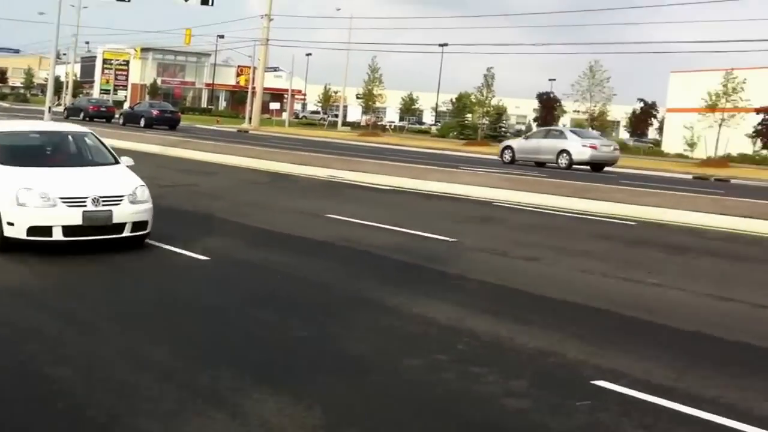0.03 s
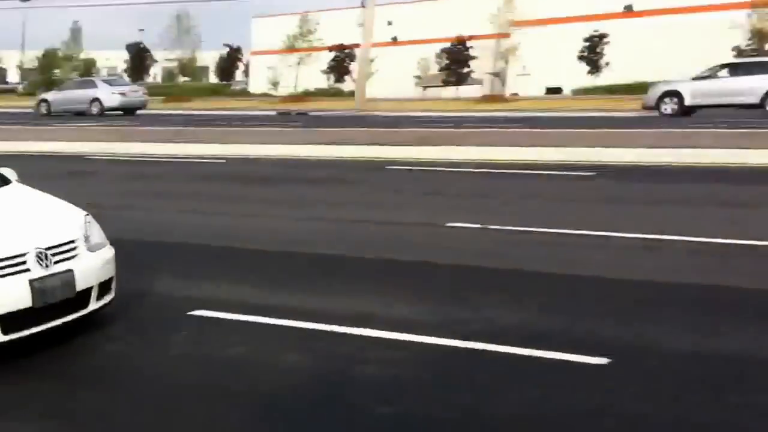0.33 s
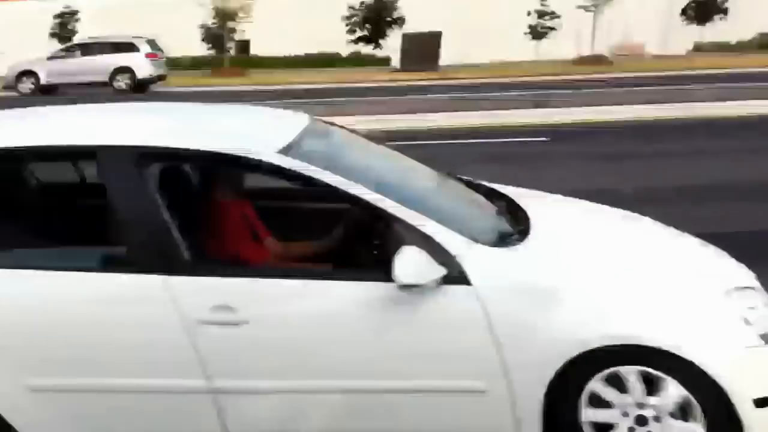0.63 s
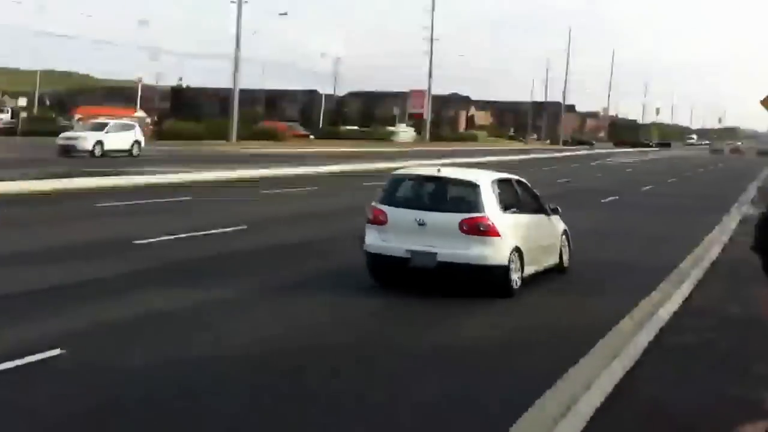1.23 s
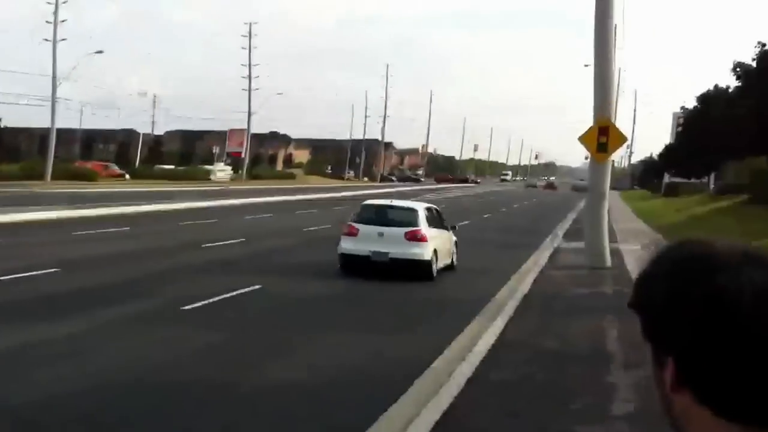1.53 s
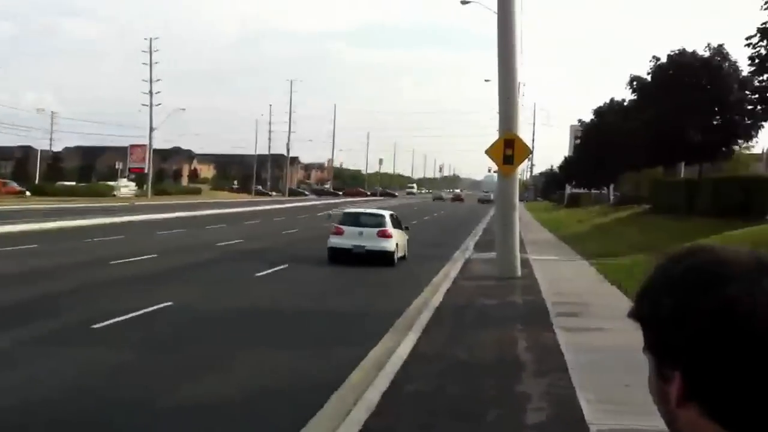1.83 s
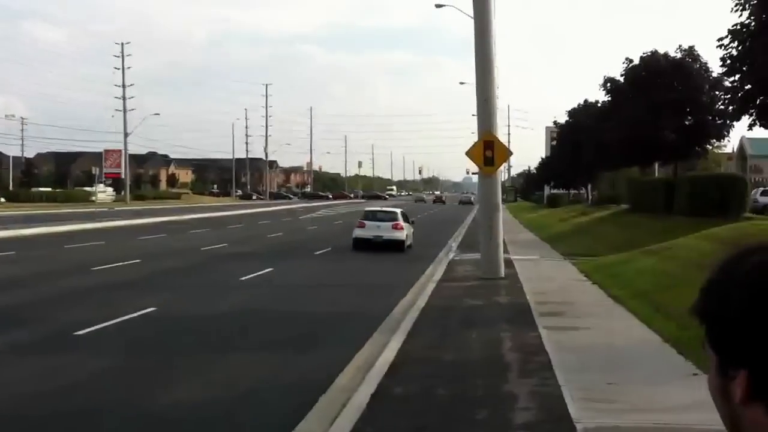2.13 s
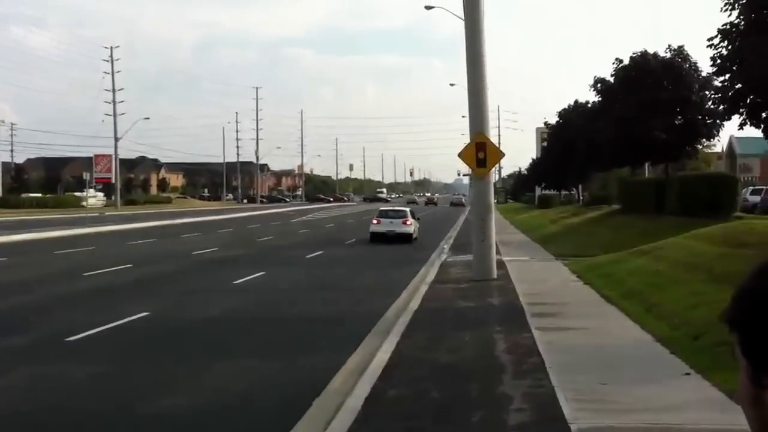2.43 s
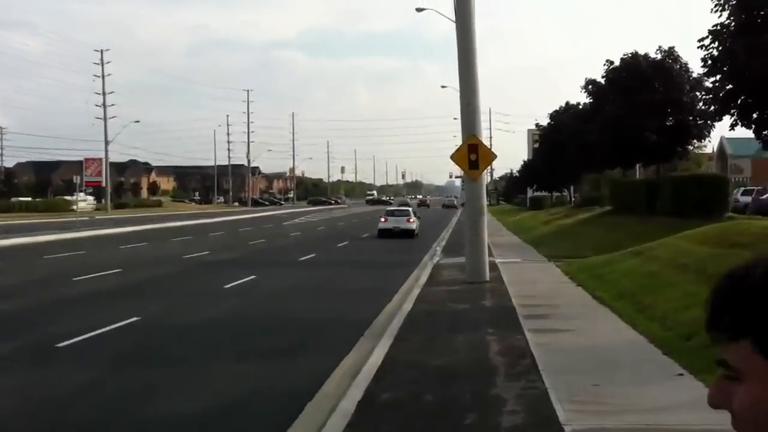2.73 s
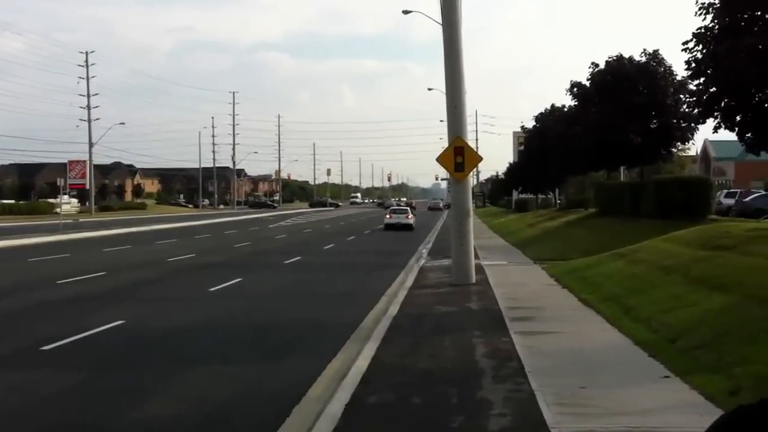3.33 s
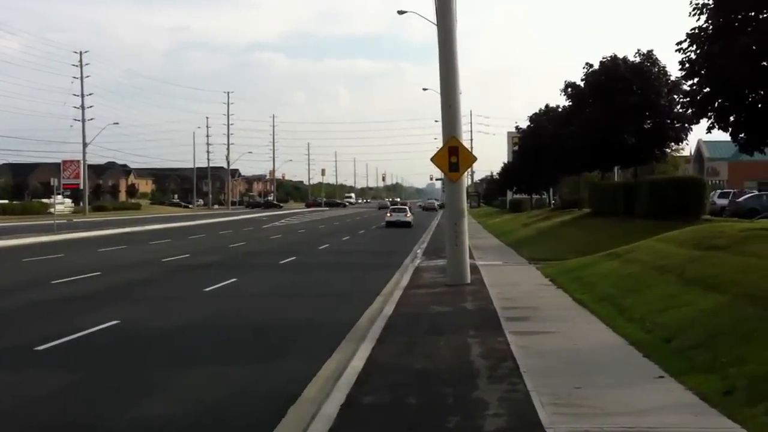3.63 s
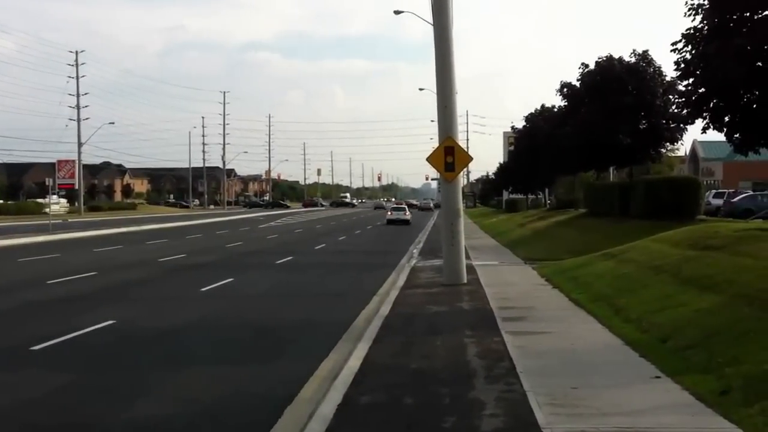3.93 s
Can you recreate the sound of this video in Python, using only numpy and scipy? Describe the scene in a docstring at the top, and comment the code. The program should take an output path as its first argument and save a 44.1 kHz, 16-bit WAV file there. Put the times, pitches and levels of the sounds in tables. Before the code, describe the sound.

A car roars by at full throttle a few metres from the microphone beside a wide road, tyres hissing and exhaust buzzing. It eases off, picks up again with a bark and recedes, with distant traffic underneath.

```python
"""A loud hatchback passes by

A five-cylinder car passes a few metres away at full throttle and drones off down a wide road.
Its nose howls and its tyres hiss on the way in; once the tailpipe faces us, every firing rasps.
The driver eases off near 1.9 s and gets back on the throttle with a bark at 2.3 s.
Far traffic and a little wind lie underneath."""
import sys
import numpy as np
from scipy import signal
from scipy.fft import rfft, irfft, next_fast_len
from scipy.io import wavfile

SR = 44100
rng = np.random.default_rng(int(sys.argv[2]) if len(sys.argv) > 2 else 0)


def to_wav(s):
    """Save 16-bit WAV."""
    ch = np.atleast_2d(s).T  # columns
    pcm = np.round(np.clip(ch, -1, 1) * 32767)  # PCM
    wavfile.write(sys.argv[1], SR, pcm.astype(np.int16))


N = 176400
TIME = np.arange(N) / SR
EASE_OFF_S = 1.95

# How fast the engine fires, with the pitch bend of passing (Doppler shift) included.
# Each row: time in seconds, firings per second.
FIRING_RATE = [(0, 206), (0.25, 211.6), (0.5, 221), (0.7, 227), (0.84, 227.6), (1.05, 221.6), (1.25, 219),
               (1.5, 222.5), (1.7, 226), (1.9, 224), (2.02, 226.4), (2.3, 221.3), (2.48, 224.2),
               (2.68, 221), (3, 219), (3.5, 212.1), (4, 203.3)]
# One row per cylinder. Each row: puff strength in dB at full throttle, the same at part throttle,
# travel time through its pipe in seconds.
CYLINDER_PUFFS = [(-4, 2, 0), (3, -0.5, 0.00071), (-8.5, -3.5, 0), (0, -0.5, 0.00082), (3, -1.5, 0.00063)]


def engine():
    """Five cylinders fire in turn, each sending a puff of its own strength down its own pipe."""
    cycles = np.cumsum(in_time(FIRING_RATE)[0]) / SR  # goes up by one per firing
    count = np.arange(1, int(cycles[-1]))
    jitter_s = 0.000012 * rng.standard_normal(N)[count]
    fired_at = np.interp(count - 0.047, cycles, TIME) + jitter_s  # just ahead of each whole cycle
    full_db, part_db, travel_s = np.array(CYLINDER_PUFFS)[count % len(CYLINDER_PUFFS)].T
    puff_db = np.where(fired_at > EASE_OFF_S, part_db, full_db)
    return cycles, fired_at, fired_at + travel_s, puff_db


# The exhaust's steady note. Each row: time in seconds, then the levels of harmonics 1 to 5 in dB.
DRONE_LEVELS = [(0, -9, -30, -28, -36, -38), (0.33, -11, -29, -20, -28, -37),
                (0.48, -18, -19, -27, -23, -38), (0.56, -29, -13, -30, -20, -34),
                (0.66, -12, -18, -24, -17, -31), (0.74, -12, -18, -29, -28, -29),
                (0.82, -8, -15, -21, -26, -28), (0.88, -13, -19, -25, -26, -24),
                (1.02, -15, -15, -23, -23, -27), (1.25, -14, -23, -18, -17, -21),
                (1.52, -15, -28, -20, -24, -28), (1.87, -15, -28, -17, -25, -40),
                (1.96, -20, -40, -30, -49, -49), (2.05, -27, -42, -44, -51, -56),
                (2.2, -20, -32, -46, -49, -54), (2.305, -22, -37, -49, -54, -51),
                (2.32, -15, -31, -30, -38, -40), (2.55, -14, -33, -27, -36, -48),
                (2.7, -16, -32, -28, -37, -48), (3.1, -16, -30, -23, -38, -50),
                (3.55, -16, -24, -21, -29, -41), (3.85, -15, -14, -18, -20, -27),
                (4, -16, -13, -15, -18, -26)]
# Harmonics 6 and 7, in dB compared with the fifth.
DRONE_TOP_DB = [-12.5, -19]
# How much each harmonic wavers. Each row: time in seconds, typical swing in dB.
DRONE_SWING = [(0, 1.6), (1.05, 1.6), (1.3, 0.9), (4, 0.6)]


def drone(cycles):
    """Regular firings make a tone of harmonics: whole multiples of the firing rate."""
    swing_db, = in_time(DRONE_SWING)
    levels = in_time(DRONE_LEVELS)
    levels += [levels[-1] + db for db in DRONE_TOP_DB]
    tone = 0
    for k, db in enumerate(levels, 1):
        phase = k * cycles - 0.054 * k * k  # higher harmonics lag behind
        tone += from_db(db + swing_db * drift(per_s=27.98)) * np.cos(2 * np.pi * phase)
    return -np.sqrt(2) * tone


# The burble of unequal cylinders. Each row: time in seconds, level in dB.
BURBLE_LEVEL = [(0, -36), (.45, -25), (.6, -19), (.8, -21.5), (1.25, -19), (1.55, -21.5), (1.87, -22.5),
                (2.03, -39.5), (2.3, -39.5), (2.36, -24.5), (2.55, -25.5), (3.2, -28.5), (4, -23.5)]
# The exhaust pipe's tone at full throttle. Each row: frequency in Hz, relative level in dB.
PIPE_FULL_TONE = [(40, -55), (90, -38.5), (135, -13.5), (180, -30), (265, -16), (320, 4.5), (365, 3),
                  (490, -15.5), (580, -10), (780, -3), (980, -4.5), (1150, -12.5), (1500, -14.5),
                  (2500, -30.5)]
# Its tone from the moment the driver eases off. Each row: frequency in Hz, relative level in dB.
PIPE_EASED_TONE = [(15, -76), (40, -55), (90, -35.5), (135, -9.5), (180, -15.5), (270, 1), (320, 3),
                   (400, -3.5), (490, -18), (580, -3), (740, -1), (850, -8.5), (1000, -14), (1200, -24.5),
                   (1420, -13.5), (2500, -60)]


def burble(times, puff_db):
    """Puffs stronger or weaker than average ring the pipe and add notes between the harmonics."""
    sizes = puff_sizes(puff_db, spread_db=0.4)
    eased = times > EASE_OFF_S
    ringing = 0
    for during, pipe in ((~eased, PIPE_FULL_TONE), (eased, PIPE_EASED_TONE)):
        uneven = sizes[during].mean() - sizes[during]
        share = during.mean()
        ringing += np.sqrt(share) * coloured(clicks(times[during], uneven), pipe)
    return loudness(BURBLE_LEVEL) * ringing


# The tailpipe's brassy overtones. Each row: time in seconds, level in dB.
BRASS_LEVEL = [(0, -26), (.8, -27), (1.05, -23), (1.22, -22), (1.4, -23), (1.58, -25), (1.74, -24.5),
               (1.87, -31.5), (1.94, -44), (2.3, -60.5), (2.5, -42.5), (3.4, -52.5), (4, -39.5)]
# Their tone. Each row: frequency in Hz, relative level in dB.
BRASS_TONE = [(100, -54.5), (700, -20.5), (1000, -5.5), (1200, 1.5), (1380, 3.5), (1600, 4), (1850, 2.5),
              (2150, -9), (2500, -1.5), (3000, -8.5), (4500, -19), (9000, -34.5)]


def brass(times, puff_db):
    """The steep front of each puff repeats cleanly and gives a brassy buzz."""
    fronts = clicks(times, -puff_sizes(puff_db, spread_db=0.45))
    return loudness(BRASS_LEVEL) * coloured(fronts, BRASS_TONE)


# The hiss spat out with the puffs. Each row: time in seconds, level in dB.
SPIT_LEVEL = [(0, -27.5), (.85, -35.5), (1.0, -24.5), (1.13, -22), (1.3, -29), (1.42, -38), (1.6, -31),
              (1.74, -26), (1.86, -34.5), (1.91, -48), (2.3, -65), (2.85, -56), (4, -56.5)]
# Its tone. Each row: frequency in Hz, relative level in dB.
SPIT_TONE = [(100, -46), (900, -11), (1600, -4.5), (2700, 0), (3400, -1), (5000, -2), (6000, -9),
             (8000, -9), (10000, -10), (12000, -21), (15500, -20)]
# The tailpipe's metallic ring, duller as the car draws away.
# Each row: time in seconds, centre frequency in Hz, level in dB.
TAILPIPE_RING = [(.8, 5610, -39), (.98, 5000, -30), (1.08, 4770, -51), (1.135, 4500, -41),
                 (1.16, 4322, -21.5), (1.28, 4470, -28), (1.4, 4220, -46), (1.5, 3800, -28.5),
                 (1.62, 2904, -33), (1.75, 2990, -34), (1.86, 3170, -29), (1.92, 3110, -54)]


def rasp(times, puff_db):
    """Strong puffs crack, ring the tailpipe and spit a short hiss."""
    cracks = clicks(times, puff_sizes(1.4 * puff_db, spread_db=1.1))  # 1.4 favours the strong puffs
    fade_s = 0.0013
    bursts = signal.lfilter([1], [1, -np.exp(-1 / (fade_s * SR))], cracks)
    spit = bursts * rng.standard_normal(N)
    ring_hz, ring_db = in_time(TAILPIPE_RING)
    ring = resonance(rms_one(cracks) + from_db(-2) * rms_one(spit), ring_hz, width_hz=1600)
    return loudness(SPIT_LEVEL) * coloured(spit, SPIT_TONE) + from_db(ring_db) * ring


# The tone of the exhaust's bark. Each row: frequency in Hz, relative level in dB.
BARK_TONE = [(20, -67.5), (80, -39), (150, 2), (200, 8), (290, -10), (400, 6), (520, 1), (680, -3),
             (900, -1), (1100, -6), (1400, -45), (4000, -53)]


def bark(times, start_s=2.312, fade_s=0.02):
    """A few ragged, heavy firings as the throttle opens again."""
    after = times[times > start_s]
    sizes = np.exp(-(after - start_s) / fade_s) * rng.uniform(0, 2, N)[:len(after)]
    burst = coloured(clicks(after, -sizes), BARK_TONE)
    share = fade_s * SR / N  # sets the level over the short burst, not the whole scene
    return from_db(-17.5) * np.sqrt(share) * burst


# The howl from the car's nose. Each row: time in seconds, base frequency in Hz, base level in dB.
HOWL_PATH = [(0, 1287, -27), (.18, 1366, -22), (.4, 1715, -17.5), (.5, 1776, -22.5), (.6, 1834, -15.5),
             (.74, 1970, -24), (.84, 2002, -23), (.92, 2160, -35), (.97, 2150, -17.5), (1.04, 1950, -22),
             (1.15, 1720, -31.5), (1.6, 1630, -65)]
# Its resonances. Each row: multiple of the base frequency, dB added to the base level.
HOWL_RESONANCES = [(1, 1), (1.24, -4), (2.05, -19.5), (2.75, -18.5)]


def howl(times, puff_db):
    """Engine pulses and rushing air stir resonances that rise as the car draws level."""
    hz, db = in_time(HOWL_PATH)
    pulses = rms_one(clicks(times, from_db(puff_db / 2)))
    air = from_db(-6) * rng.standard_normal(N)
    return sum(from_db(db + added_db) * resonance(pulses + air, hz * ratio, width_hz=220 * ratio)
               for ratio, added_db in HOWL_RESONANCES)


# The air intake's growl, heard from the front. Each row: time in seconds, level in dB.
GROWL_LEVEL = [(0, -20.5), (.35, -19), (.6, -26.5), (.8, -41), (1.1, -40)]
# Its tone. Each row: frequency in Hz, relative level in dB.
GROWL_TONE = [(20, -61), (100, -42), (180, 0.5), (260, -24), (350, -3.5), (400, 6), (480, -15.5),
              (580, 0.5), (640, -5.5), (720, -13), (900, -10), (1200, -11.5), (2000, -37.5)]


def growl(times, puff_db):
    """The engine sucks in air in uneven gulps."""
    sizes = puff_sizes(puff_db, spread_db=2.0)
    gulps = clicks(times, sizes - sizes.mean())
    return loudness(GROWL_LEVEL) * coloured(gulps, GROWL_TONE)


# The hiss of tyres and rushing air. Each row: time in seconds, level in dB.
TYRE_LEVEL = [(0, -23), (.25, -18.5), (.45, -19), (.65, -20.5), (.9, -19), (1.15, -24), (1.5, -26),
              (1.85, -24), (1.95, -50), (4, -50.5)]
# Its tone. Each row: frequency in Hz, relative level in dB.
TYRE_TONE = [(20, -27), (60, -19.5), (130, -5.5), (250, -3), (400, 0), (750, 2.5), (1150, 0.5),
             (1700, -6.5), (2600, 3), (3300, -10.5), (4500, -6.5), (6000, -9), (7500, -15), (10000, -17.5),
             (14000, -21.5), (16000, -29.5)]


def tyres():
    """Tread and air noise swell as the car passes."""
    return loudness(TYRE_LEVEL) * noise(TYRE_TONE)


# How late the reflected sound arrives. Each row: time in seconds, delay in seconds.
REFLECTION_DELAY = [(0, 0.00079), (.3, 0.0006), (.6, 0.00054), (1, .00046), (1.2, 0.000464),
                    (1.6, 0.000664), (1.9, 0.00076), (4, 0.0008)]


def with_reflection(direct, strength=0.42):
    """The direct sound mixes with a weaker copy whose delay changes as the car moves."""
    late = np.interp(TIME - in_time(REFLECTION_DELAY)[0], TIME, direct)
    return (direct + strength * late) / np.hypot(1, strength)


# The tone of far traffic. Each row: frequency in Hz, relative level in dB.
TRAFFIC_TONE = [(25, -33), (70, -26), (130, -6.5), (300, 2.5), (600, 0.5), (950, -4), (1300, -8),
                (2400, -10.5), (3200, -23), (4800, -24.5), (7000, -43.5), (9500, -41.5), (15000, -50)]


def traffic():
    """Distant cars blend into one steady, dull rush."""
    return from_db(-33) * noise(TRAFFIC_TONE)


# The wind. Each row: time in seconds, level in dB before random gusts are added.
WIND_LEVEL = [(0, -54), (.4, -47), (.55, -56), (.85, -41), (1.15, -36), (1.5, -57), (1.85, -60), (2, -52),
              (4, -78)]
# Its tone. Each row: frequency in Hz, relative level in dB.
WIND_TONE = [(20, -3), (45, 0), (100, -13), (200, 11), (800, -58)]


def wind():
    """Light wind buffets the listener with a low, lumpy rumble."""
    gust_db = 3 * drift(per_s=15)
    return loudness(WIND_LEVEL) * from_db(gust_db) * noise(WIND_TONE)


# Brief rustles. Each row: time of the peak in seconds, half length in seconds, peak level in dB.
RUSTLE_SWELLS = [(3.255, .012, -48), (3.3, .025, -41.5), (3.375, 0.016, -43.5)]
# Their tone. Each row: frequency in Hz, relative level in dB.
RUSTLE_TONE = [(1500, -34), (3700, 5), (6000, -3), (9000, -1), (14000, -12), (16000, -27)]


def rustle():
    """Three faint swells of high hiss sound close by."""
    swells = sum(from_db(db) * np.exp(-((TIME - s) / half) ** 2) for s, half, db in RUSTLE_SWELLS)
    return swells * noise(RUSTLE_TONE)


def from_db(db):
    """Turn decibels into a number to multiply by."""
    return 10 ** (np.asarray(db) / 20)


def in_time(rows):
    """Join a table's rows with straight lines: one curve for each column after the time."""
    seconds, *columns = np.transpose(rows)
    return [np.interp(TIME, seconds, column) for column in columns]


def loudness(rows):
    """Turn a table of times and dB into a volume curve."""
    return from_db(in_time(rows)[0])


def rms_one(x):
    """Scale a signal so that its average size (rms) is 1."""
    return x / np.sqrt(np.mean(x ** 2) + 1e-20)


def coloured(x, tone):
    """Filter a sound to give it the tone in a table; average size 1."""
    size = next_fast_len(N + SR // 2, True) // 2 * 2
    hz, db = np.transpose(tone)
    grid_hz = np.maximum(np.arange(size // 2 + 1) * SR / size, 1)
    gains = from_db(np.interp(np.log(grid_hz), np.log(hz), db))
    # Fold the filter so that it rings only after each click, never before (minimum phase).
    cepstrum = irfft(np.log(gains))
    cepstrum[1:size // 2] *= 2
    cepstrum[size // 2 + 1:] = 0
    response = np.exp(rfft(cepstrum))
    return rms_one(irfft(rfft(x, size) * response)[:N])


def noise(tone):
    """Noise with the tone in a table; average size 1."""
    return coloured(rng.standard_normal(N), tone)


def drift(per_s):
    """Glide between random values, per_s of them a second; average size 1."""
    return rms_one(np.interp(TIME * per_s, np.arange(N), rng.standard_normal(N)))


def puff_sizes(db, spread_db):
    """Puff sizes that differ a little by chance."""
    return from_db(db + spread_db * rng.standard_normal(N)[:len(db)])


def clicks(times, sizes):
    """One click at each time, shared between the two nearest samples."""
    out, at = np.zeros(N), np.clip(times * SR, 0, N - 2)
    i = at.astype(int)
    np.add.at(out, i, sizes * (1 - at + i))
    np.add.at(out, i + 1, sizes * (at - i))
    return out


def resonance(x, hz, width_hz, block=128):
    """Make a sound ring around a moving frequency; average size 1."""
    out, state = np.zeros(N), np.zeros(4)
    radius = np.exp(-np.pi * width_hz / SR)
    trim_ends = [1, 0.052, -1.95, 0.044, 0.79]  # weakens the lowest and highest frequencies
    for i in range(0, N, block):
        ring = [1, -2 * radius * np.cos(2 * np.pi * hz[i] / SR), radius * radius]
        ring_twice = np.convolve(ring, ring)
        out[i:i + block], state = signal.lfilter(trim_ends, ring_twice, x[i:i + block], zi=state)
    return rms_one(out)


def scene():
    """The same firings drive every engine sound; tyres and the roadside join them in one channel."""
    cycles, fired_at, exits_at, puff_db = engine()
    exhaust = drone(cycles) + burble(fired_at, puff_db) + brass(exits_at, puff_db) + bark(fired_at)
    front = growl(fired_at, puff_db) + howl(exits_at, puff_db)
    hiss = with_reflection(rasp(exits_at, puff_db) + tyres())
    roadside = wind() + traffic() + rustle()
    return (exhaust + front + hiss + roadside)[None]


def record(dry):
    """Round off the highest peaks and cut the very top of the treble."""
    rounded = dry / (1 + dry ** 8) ** (1 / 8)
    treble_cut = signal.cheby2(16, 70, 16250, fs=SR, output="sos")  # 70 dB down from 16250 Hz
    return signal.sosfilt(treble_cut, rounded)


dry = scene()
out = record(dry)
to_wav(out)
```